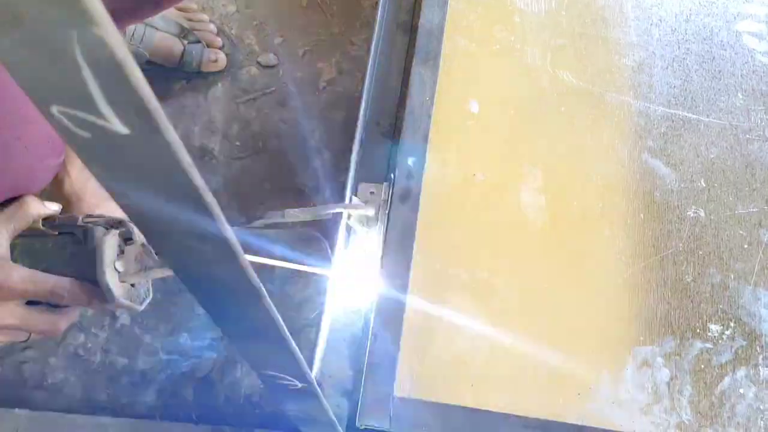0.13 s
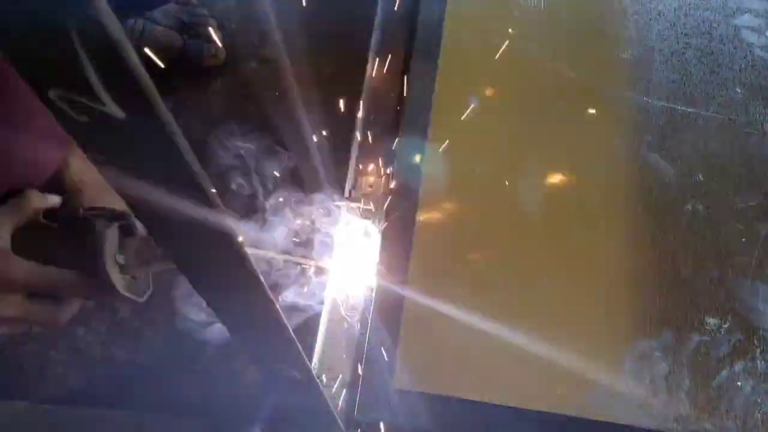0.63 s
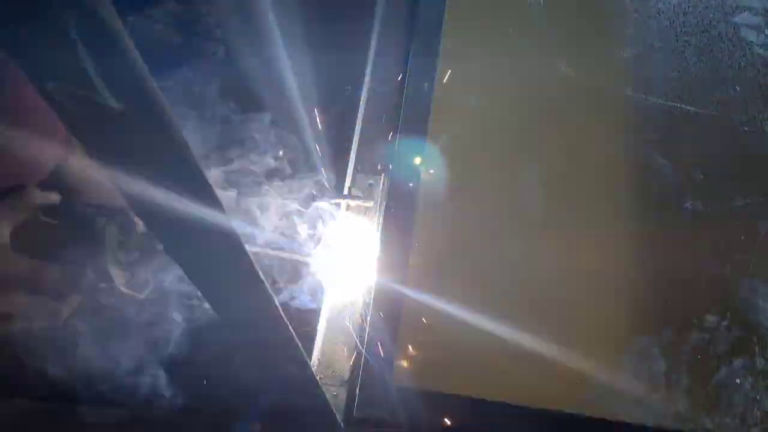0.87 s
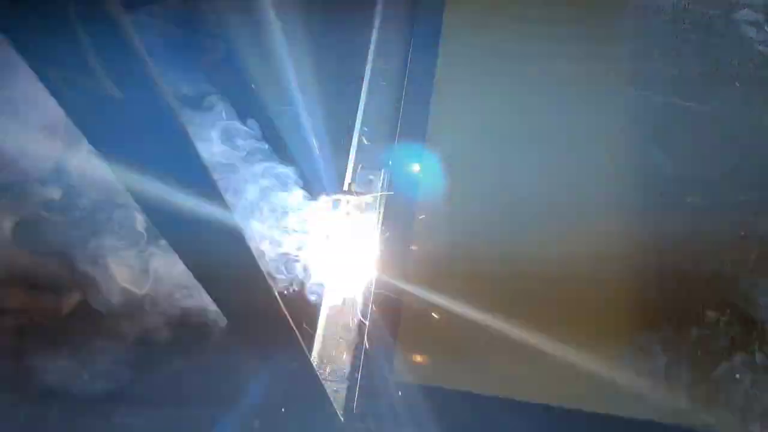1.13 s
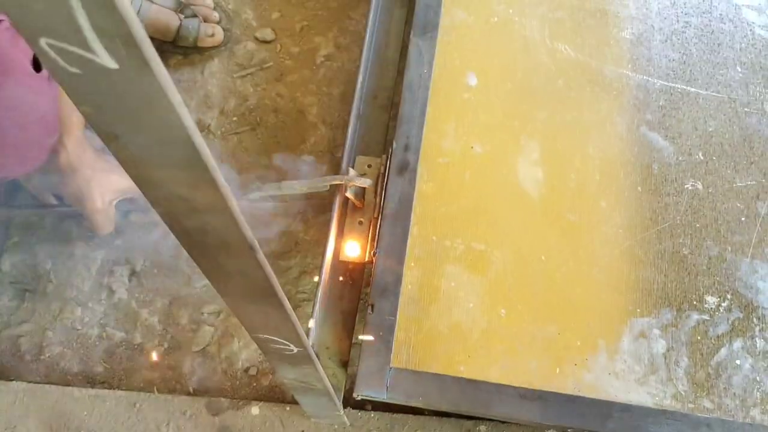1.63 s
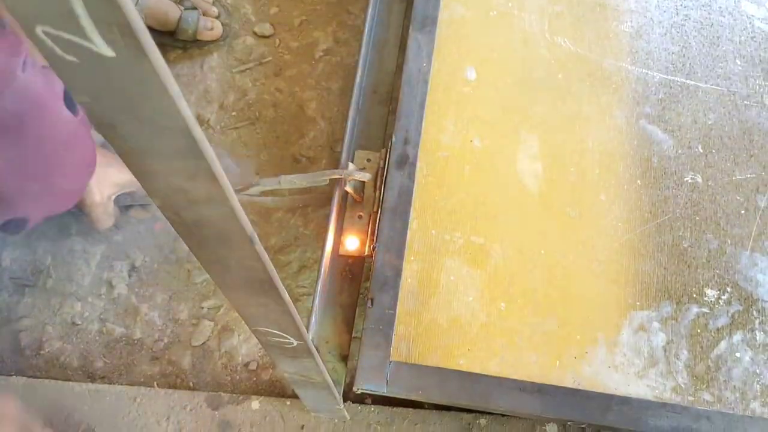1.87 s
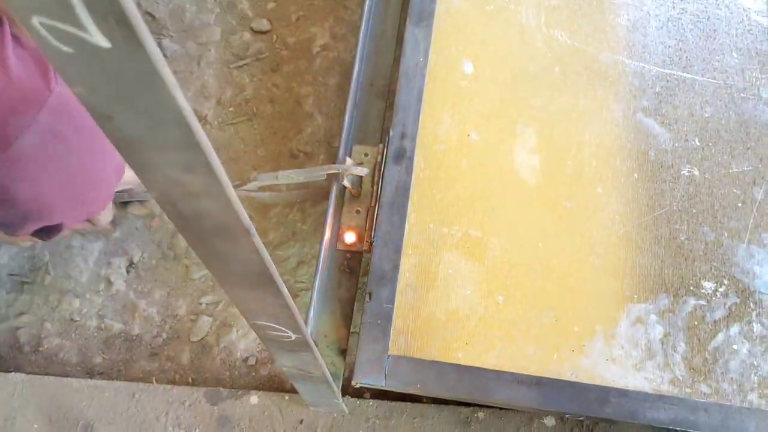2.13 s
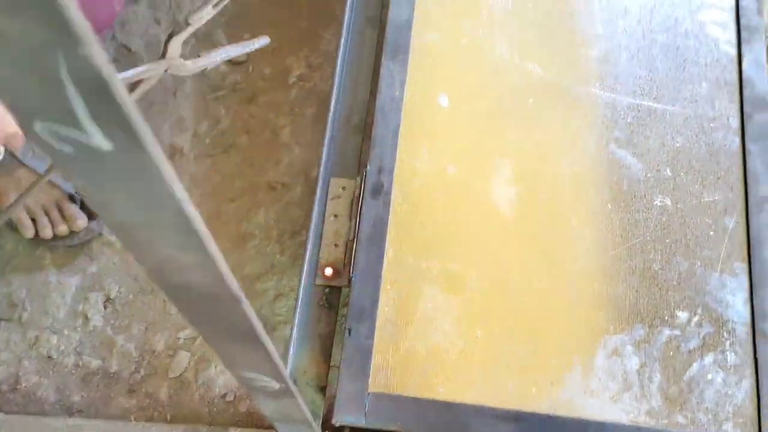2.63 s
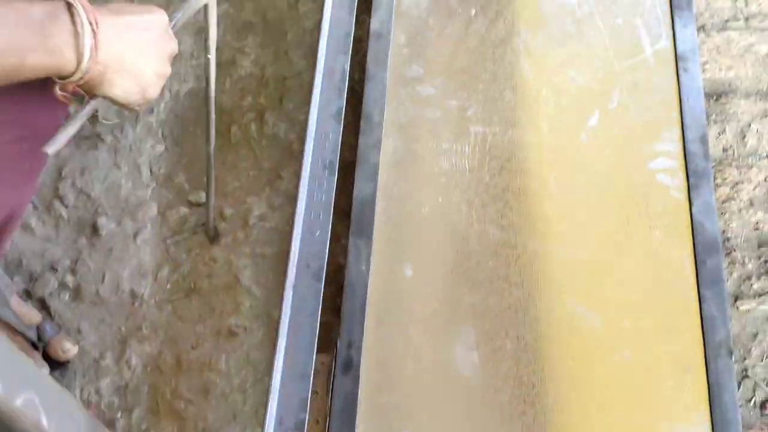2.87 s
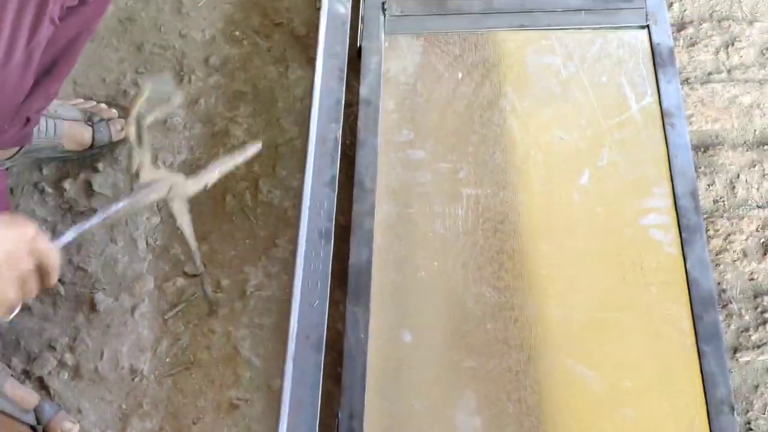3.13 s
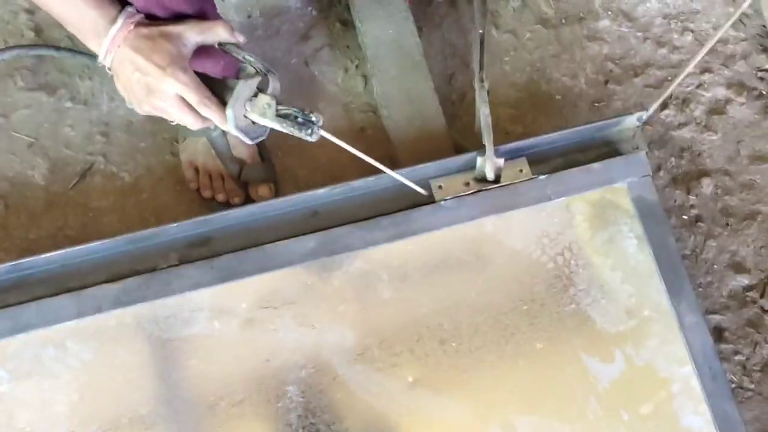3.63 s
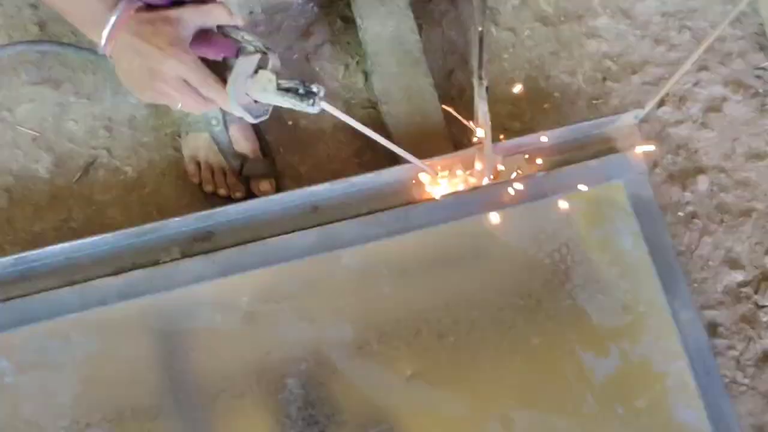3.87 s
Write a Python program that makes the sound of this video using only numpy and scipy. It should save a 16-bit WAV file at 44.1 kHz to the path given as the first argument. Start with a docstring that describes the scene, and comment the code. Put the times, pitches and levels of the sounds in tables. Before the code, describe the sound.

A welding arc sizzles, spits and buzzes over a faint transformer hum outdoors; then tongs clink, a steel bar scrapes over gritty ground, and after a brief dropout a frame is knocked, close stereo microphone.

```python
"""A transformer hums outdoors; a stick welder's arc, pulsed noise and clicks, sizzles, spits and buzzes.
A faint chirp, a gliding tone, comes before tongs clink and a steel bar drags over gritty ground:
struck modes and hiss, then coloured grit noise driving low resonances. The sound drops out for a moment,
then come wind on the microphone (low noise), a knock on a frame (damped modes),
a distant horn (summed harmonics) and a scuff (the treble of the grit noise)."""
import sys
import numpy as np
from scipy import signal
from scipy.fft import rfft, irfft
from scipy.io import wavfile
from scipy.ndimage import uniform_filter1d

SR = 44100
rng = np.random.default_rng(int(sys.argv[2]) if len(sys.argv) > 2 else 0)


def nominal_scale(level):
    """Amplitude ratio for a level in decibels (scalar or array-like)."""
    x = np.asarray(level, float) / 20
    return 10 ** x


def digitize_waveform(pressure):
    """Quantize a signal to 16-bit integers and store it at the path in sys.argv[1].

    Rows of a 2-D input are taken as channels; values are limited to [-1, 1].
    """
    field = np.atleast_2d(pressure).T
    bounded = np.clip(field, -1, 1)
    quanta = np.round(bounded * 32767).astype(np.int16)
    wavfile.write(sys.argv[1], SR, quanta)


N = 176400
T = np.arange(N) / SR  # time [s]


def evened(x):
    """Normalisation: scales a signal to unit rms."""
    return x / np.sqrt(np.mean(x ** 2) + 1e-20)


def read(points, hz):
    """Spectral interpolation: reads a table along a logarithmic frequency axis."""
    f, value = np.transpose(points)
    return np.interp(np.log(hz + 1), np.log(f + 1), value)


def level(rows, column=1):
    """Amplitude envelope: gain interpolated in dB over time, silent outside the table."""
    rows = np.array(rows)
    return nominal_scale(np.interp(T, rows[:, 0], rows[:, column], left=-200, right=-200))


def colour(x, gain):
    """Linear filtering: multiplies the spectrum by a gain over frequency."""
    return irfft(rfft(x) * gain(np.fft.rfftfreq(N, 1 / SR)), N)


def slow(width_s):
    """Random fluctuation: white noise averaged twice over a window, at unit rms."""
    size = round(width_s * SR)
    once = uniform_filter1d(rng.standard_normal(N), size)
    return evened(uniform_filter1d(once, size))


def grains(per_s, spread_db):
    """Impulsive noise: sparse random clicks, a few of them large, at unit rms."""
    happens = rng.random(N) < per_s / SR
    size = nominal_scale(spread_db * np.minimum(rng.exponential(1, N), 4))
    return evened(rng.standard_normal(N) * happens * size)


def add(mix, s, sound):
    """Superposition: adds a sound to the mix from a given time."""
    part = mix[round(s * SR):][:len(sound)]
    part += sound[:len(part)]


def ring(modes, t60):
    """Modal vibration: one blow excites decaying sines, scattered in pitch and strength."""
    t = T[:SR // 4]
    x = np.zeros(len(t))
    for hz, db in modes:
        fading = nominal_scale(db + 2 * rng.standard_normal() - 60 * t / t60)
        x += fading * np.sin(2 * np.pi * hz * (1 + 0.0247 * rng.standard_normal()) * t)
    return x / abs(x).max()


PULSE_HZ = 99.82  # twice the mains frequency
# idle transformer: (time [s], relative level [dB])
HUM_LEVEL = [(0, -41.5), (.25, -34.5), (.36, -48.5), (1.5, -46.5), (1.71, -35), (2.5, -34), (3.15, -40),
             (4, -44)]
# its partials: (multiple of PULSE_HZ, relative level [dB])
HUM_PARTIALS = [(2, -0.5), (4, -19.5), (7.5, -24.5), (10, -26)]


def hum():
    """Additive synthesis: an idle transformer vibrates at multiples of twice the mains frequency."""
    tone = sum(nominal_scale(db) * np.cos(2 * np.pi * (k * PULSE_HZ * T + rng.random())) for k, db in HUM_PARTIALS)
    return level(HUM_LEVEL) * np.sqrt(2) * tone


# outdoor background: (time [s], relative level [dB], further level of the treble [dB])
YARD_LEVEL = [(0, -44, -0.5), (1.4, -42, -2.5), (2.3, -45.5, 4.5), (3.447, -46, -1.5), (3.456, -37, 10.5),
              (4, -35, 4)]
# its spectrum: (frequency [Hz], gain [dB])
YARD_SPECTRUM = [(30, -3), (250, 6.5), (900, -5.5), (1500, -10.5), (4000, -25.5), (16000, -41.5)]


def yard():
    """Filtered noise: an outdoor background whose treble fluctuates apart from the rest."""
    air = evened(colour(rng.standard_normal(N), lambda hz: nominal_scale(read(YARD_SPECTRUM, hz))))
    low = colour(air, lambda hz: 1 / (1 + (hz / 1500) ** 2))
    treble_gain = level(YARD_LEVEL, column=2) * nominal_scale(3.9 * slow(0.072))
    return level(YARD_LEVEL) * (low + treble_gain * (air - low))


# burning of the arc: (time [s], relative level [dB])
ARC_LEVEL = [(.255, -48), (.267, -38.5), (.37, -28.5), (.5, -23), (.53, -32.5), (.605, -39.5), (.625, -22),
             (.68, -34), (.78, -27), (.835, -37), (.86, -25.5), (.98, -32.5), (1.06, -28.5), (1.375, -34.5),
             (1.44, -71)]
# colour of sizzle and spits: (frequency [Hz], gain [dB])
SIZZLE_SPECTRUM = [(70, -16), (400, -4), (1200, 1), (1550, -3), (2200, -0.5), (5000, -4), (15300, -2)]
# spits of molten metal: (time [s], relative peak [dB])
SPITS_OF_METAL = [(0.3366, -7.5), (0.377, -10), (0.437, -6.5), (0.845, -8), (0.9896, -5.5), (1.01, -8.5),
                  (1.0478, -3.5), (1.1113, -5)]
# gas bursts from the pool: (time [s], relative peak [dB], frequency [Hz])
GAS_BURSTS = [(0.989, -14, 255), (1.115, -30.5, 83)]
SPIT_T60_S, PUFF_T60_S, BURST_T60_S = 0.004, 0.17, 0.028  # times to fall 60 dB
PUFF_DB = -12.5  # relative to its spit
SPARKS_PER_S, SPARK_SPREAD_DB, SPARKS_DB = 500, 11.5, -6
BUZZ_DB, BUZZ_FIRST_DB = -42, -39  # higher multiples, first multiple
BUZZ_WAVER, PULSE_DEPTH = 0.79, 0.11
BODY_HZ, BODY_SHARE = 3000, 0.13  # below BODY_HZ only this share of the larger level swings is followed


def sizzle(burn):
    """Amplitude modulation: noise pulses with the current among sparks, its low body held steadier."""
    pulse = 1 + PULSE_DEPTH * np.cos(2 * np.pi * PULSE_HZ * T)
    hiss = rng.standard_normal(N) * pulse * nominal_scale(2.32 * slow(0.0037))
    x = burn * (hiss + nominal_scale(SPARKS_DB) * grains(SPARKS_PER_S, SPARK_SPREAD_DB))
    body = colour(x, lambda hz: 1 / (1 + (hz / BODY_HZ) ** 2))
    strength = np.maximum(burn, burn.max() / 3) / burn.max()
    return x + body * (strength ** (BODY_SHARE - 1) / np.sqrt(2) - 1)


def add_spits(x):
    """Transient noise: each spit is a sharp burst with a longer, weaker puff."""
    t = T[:SR // 8]
    for s, db in SPITS_OF_METAL:
        fading = nominal_scale(-60 * t / SPIT_T60_S) + nominal_scale(PUFF_DB - 60 * t / PUFF_T60_S)
        add(x, s, nominal_scale(db) * rng.uniform(-1.1, 1, len(t)) * fading)


def arc_buzz(burn):
    """Harmonic series: multiples of the pulse rate waver separately while the arc burns."""
    on = np.minimum(burn / np.median(burn[burn > 1e-4]), 1) ** .5
    buzz = np.zeros(N)
    for k in (1, *range(3, 14)):
        strength = nominal_scale(BUZZ_DB if k > 1 else BUZZ_FIRST_DB) * (1 + BUZZ_WAVER * slow(0.03))
        buzz += strength * np.cos(2 * np.pi * (k * PULSE_HZ * T + rng.random()))
    return on * buzz


def add_gas_bursts(x):
    """Damped oscillation: each gas burst is an exponentially decaying sine."""
    t = T[:SR // 8]
    for s, db, hz in GAS_BURSTS:
        add(x, s, nominal_scale(db - 60 * t / BURST_T60_S) * 2 * np.sin(2 * np.pi * hz * t))


def arc():
    """Superposition: coloured sizzle and spits join the tonal buzz and gas bursts of the arc."""
    burn = level(ARC_LEVEL)
    noisy = sizzle(burn)
    add_spits(noisy)
    tonal = arc_buzz(burn)
    add_gas_bursts(tonal)
    return colour(noisy, lambda hz: nominal_scale(read(SIZZLE_SPECTRUM, hz))) * 2 + tonal


# chirp: (time [s], frequency [Hz], relative level [dB])
BIRD_CHIRP = [(1.648, 5280, -69), (1.709, 4700, -64), (1.772, 5830, -55)]


def bird():
    """Frequency modulation: a faint chirp is a flickering sine that glides down, then up."""
    s, hz, _ = np.transpose(BIRD_CHIRP)
    turns = np.cumsum(np.interp(T, s, hz)) / SR
    return level(BIRD_CHIRP, column=2) * slow(0.0013) * np.sin(2 * np.pi * turns)


# clinks: (time [s], peak [dB], centre of the part that rings most [Hz], rattle length [s])
TONG_CLINKS = [(1.828, -27, 6000, 0.073), (1.839, -15, 12700, 0.0063), (1.889, -19.5, 11000, 0.0082),
               (1.894, -37, 7900, 0.11), (1.979, -29, 3700, 0.025), (2.13, -26.5, 6900, 0.029),
               (2.409, -32.5, 2380, 0.047), (2.512, -19, 2340, 0.037), (2.825, -10.5, 2320, 0.031)]
# resonances of the tongs: (frequency [Hz])
TONG_MODES = [2293, 2740, 3690, 4350, 6610, 8500, 9810, 12650]
TONGS_T60_S = 0.057
RATTLE_DB = 1  # peak of the hiss relative to the ringing
FOCUS_HZ = 11000  # blows centred far below this ring a narrow group of modes


def tongs():
    """Modal excitation: a short rattle of contacts rings the tongs, with a gritty hiss of like colour."""
    out, t = np.zeros(N), T[:SR // 4]
    for s, db, centre_hz, length_s in TONG_CLINKS:
        focus_db = lambda hz: -(FOCUS_HZ / centre_hz * np.log2((hz + 1) / centre_hz)) ** 2
        fade = np.exp(-(t / length_s) ** 2)
        contacts = rng.standard_normal(len(t)) * fade * (rng.random(len(t)) < .03)
        contacts[0] = 2  # the first contact
        blow = ring([(hz, focus_db(hz)) for hz in TONG_MODES], TONGS_T60_S)
        ringing = signal.fftconvolve(contacts, blow)
        spectrum = rfft(rng.standard_normal(len(t))) * nominal_scale(focus_db(np.fft.rfftfreq(len(t), 1 / SR)))
        hiss = irfft(spectrum, len(t)) * fade
        add(out, s, nominal_scale(db) * ringing / (abs(ringing).max() + 1e-9))
        add(out, s, nominal_scale(db + RATTLE_DB) * hiss / abs(hiss).max())
    return out


# bar resonances: (frequency [Hz], relative drive [dB], time the sliding contact drives it best [s])
BAR_MODES = [(262.8, -1, 2.87), (297.5, -0.37, 2.92), (349.5, 2.8, 2.37)]
BAR_WIDTH_HZ, BOOM_DB = 19, -2
SLIDE_DB_PER_S = 27.5  # loss of drive away from the best time
BOOM_SHARE = 0.91  # of the swings in grit level that the ringing follows


def bar(press, peak):
    """Driven resonance: the moving contact favours different low modes of the bar at different times."""
    push = press ** BOOM_SHARE * (press > 1e-6) * rng.standard_normal(N)
    out = np.zeros(N)
    for hz, db, s in BAR_MODES:
        drive = push * nominal_scale(db - SLIDE_DB_PER_S * abs(T - s))
        out += colour(drive, lambda f: np.minimum(f / hz, 1) / (1 + 2j * (f - hz) / BAR_WIDTH_HZ))
    return evened(out) * nominal_scale(BOOM_DB) * push.std() * peak


# grit under the dragged bar: (time [s], relative level [dB])
DRAG_LEVEL = [(2.495, -37), (2.515, -26), (2.586, -17.5), (2.68, -39.5), (2.716, -20.5), (2.776, -27),
              (2.802, -12), (2.93, -12), (2.99, -20), (3.05, -20), (3.12, -37), (3.148, -25.5),
              (3.26, -31.5), (3.33, -53.5)]
# its spectrum: (frequency [Hz], gain [dB])
GRIT_SPECTRUM = [(300, -9), (2300, 2), (5500, -6), (14000, -3)]
# last scuff: (time [s], relative level [dB])
SCUFF_LEVEL = [(3.85, -49), (3.89, -22), (4, -31.5)]
GRIT_BRIGHT = 1.64  # the treble swings more than the grit level


def drag():
    """Friction noise: grit under the bar is brighter when pressed hard; a scuff uses its treble."""
    rough = rng.standard_normal(N) + grains(780, 3.4)
    grit = evened(colour(rough, lambda hz: nominal_scale(read(GRIT_SPECTRUM, hz))))
    treble = colour(grit, lambda hz: hz ** 2 / (hz ** 2 + 1800 ** 2))
    grind = level(DRAG_LEVEL)
    press = grind / grind.max()
    ground = grind * (grit - treble + treble * press ** (GRIT_BRIGHT - 1))
    return ground + 2 * level(SCUFF_LEVEL) * treble + bar(press, grind.max())


# silent gap, after which the wind is heard: (start [s], end [s])
GAP_S = (3.403, 3.438)
WIND_DB, WIND_HZ = -46, 109.5  # median gain, low-pass half-gain frequency


def wind():
    """Low-frequency noise: lumpy wind on the microphone, heard after the gap."""
    rumble = colour(rng.standard_normal(N), lambda hz: hz / (30 + hz) / (1 + (hz / WIND_HZ) ** 2))
    return nominal_scale(WIND_DB + 1.4 * slow(0.092)) * (T > GAP_S[1]) * evened(rumble)


# bumps: (time [s], peak [dB])
BUMPS = [(3.453, -26), (3.4611, -10.5), (3.48, -16.5)]
# frame resonances: (frequency [Hz], relative level [dB])
FRAME_MODES = [(292, 0), (435, 2), (755, 6), (1000, -4), (1237, 4), (2150, -6)]
FRAME_T60_S = 0.043


def knocks():
    """Impact excitation: each bump shudders briefly and rings the damped modes of the frame."""
    out, t = np.zeros(N), T[:SR // 20]
    for s, db in BUMPS:
        shudder = rng.standard_normal(len(t)) * np.exp(-t / 0.012)
        sound = signal.fftconvolve(shudder, ring(FRAME_MODES, FRAME_T60_S))
        add(out, s, nominal_scale(db) * sound / abs(sound).max())
    return out


# horn partials: (multiple of HORN_HZ, relative level [dB])
HORN_PARTIALS = [(7, -32), (8, -29.5), (9, -28), (10, -37.5)]
HORN_HZ, HORN_S, HORN_RISE_S = 393.7, 3.848, 0.031  # fundamental, start, rise time


def horn():
    """Additive synthesis: a distant vehicle horn sums fluctuating harmonics under a linear rise."""
    out = np.zeros(N)
    for k, db in HORN_PARTIALS:
        out += nominal_scale(db + 2 * slow(0.0058)) * np.cos(2 * np.pi * (k * HORN_HZ * T + rng.random()))
    return np.clip((T - HORN_S) / HORN_RISE_S, 0, 1) * out


# likeness of the two sides: (frequency [Hz], shared fraction [1])
LIKENESS = [(60, 1), (300, 0.73), (15000, 0.06)]
# balance: (frequency [Hz], left minus right gain [dB])
BALANCE = [(30, -0.5), (500, 1.5), (1500, 5), (15000, -0.1)]
WELD_LAG_S, BAR_LAG_S = 0.000331, .0001  # delay of the shared part at the left


def scene():
    """Interaural coherence: the left shares part of each noisy sound, late; the rest is independent."""
    left = hum() + bird() + knocks() + horn()
    right = left.copy()
    same = lambda hz: np.clip(read(LIKENESS, hz), 0, 1)
    sources = [(lambda: yard() + wind(), WELD_LAG_S), (lambda: arc() + tongs(), WELD_LAG_S), (drag, BAR_LAG_S)]
    for source, lag_s in sources:
        near, other = source(), source()
        right += near
        left += colour(near, lambda hz: same(hz) * np.exp(-2j * np.pi * hz * lag_s))
        left += colour(other, lambda hz: np.sqrt(1 - same(hz) ** 2))
    return np.array([colour(left, lambda hz: nominal_scale(.5 * read(BALANCE, hz))),
                     colour(right, lambda hz: nominal_scale(-.5 * read(BALANCE, hz)))])


def low_pass(x):
    """Removes everything above the highest recorded frequency."""
    return signal.sosfilt(signal.butter(12, 16800, fs=SR, output="sos"), x)


NOTCH_HZ, NOTCH_DB, NOTCH_WIDTH_HZ = 9825, -16.5, 450
EDGE_HZ = 15700  # the treble falls steeply above this


def record(dry):
    """Transduction: microphone notch, soft overload, a steep upper limit and a brief dropout."""
    x = colour(dry, lambda hz: nominal_scale(NOTCH_DB * np.exp(-((hz - NOTCH_HZ) / NOTCH_WIDTH_HZ) ** 2)))
    x = colour(np.tanh(x), lambda hz: nominal_scale(np.clip((EDGE_HZ - hz) / 10, -60, 0)))
    on = uniform_filter1d(((T < GAP_S[0]) | (T > GAP_S[1])) * 1., size=60)  # softened edges
    return low_pass(x * on)


dry = scene()
out = record(dry)
digitize_waveform(out)
```